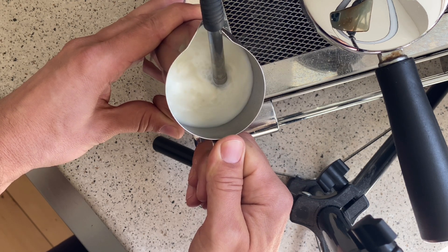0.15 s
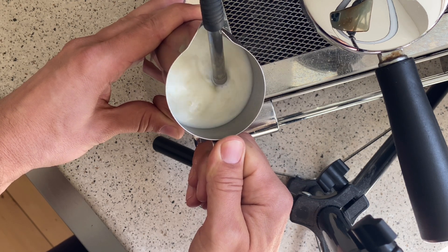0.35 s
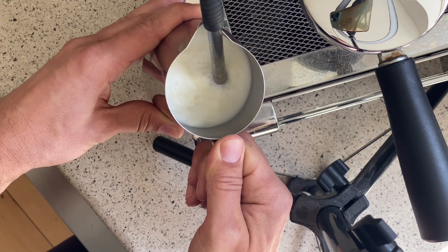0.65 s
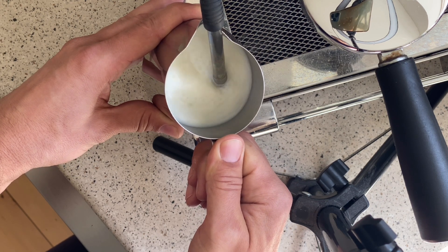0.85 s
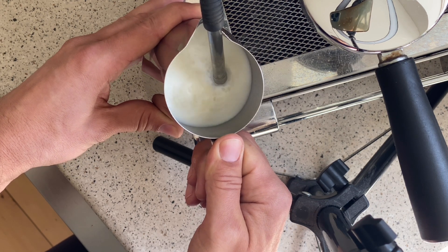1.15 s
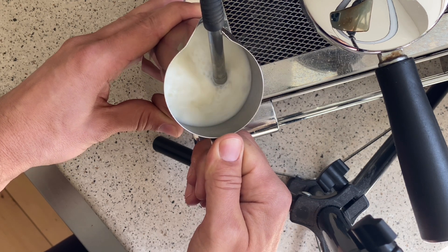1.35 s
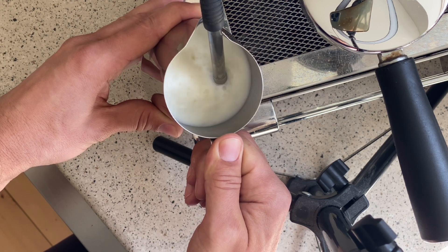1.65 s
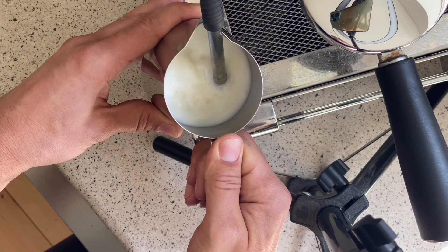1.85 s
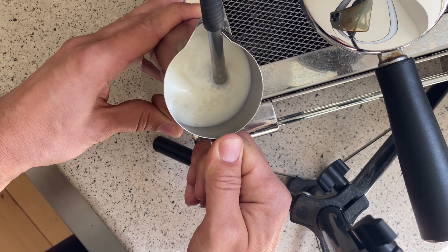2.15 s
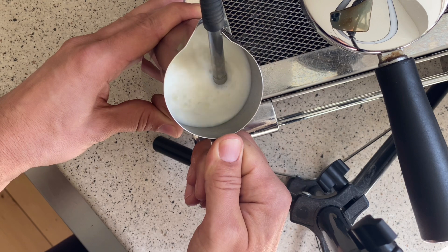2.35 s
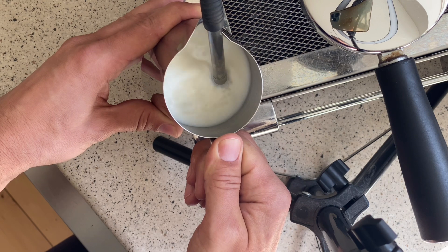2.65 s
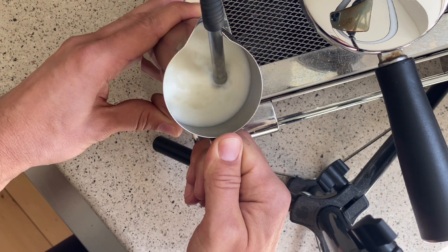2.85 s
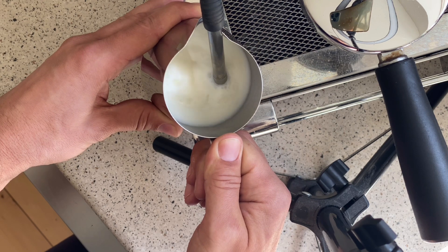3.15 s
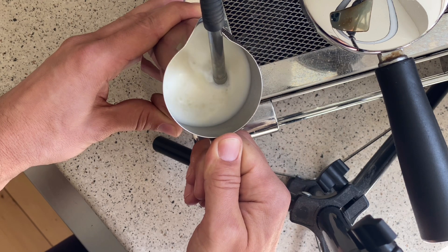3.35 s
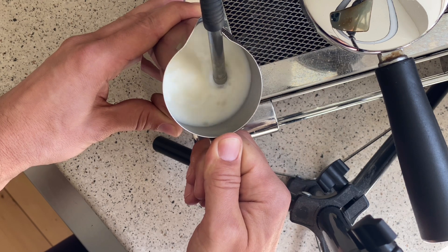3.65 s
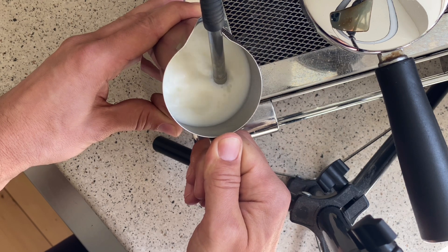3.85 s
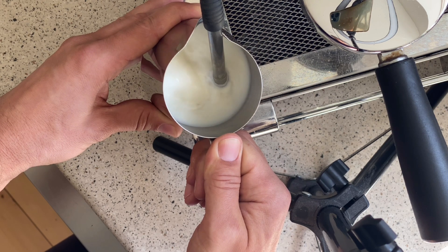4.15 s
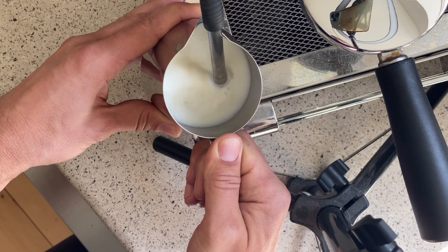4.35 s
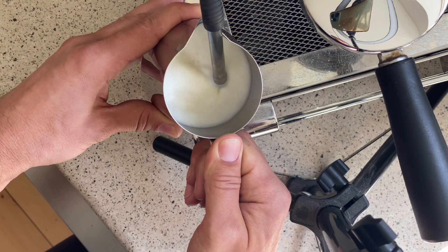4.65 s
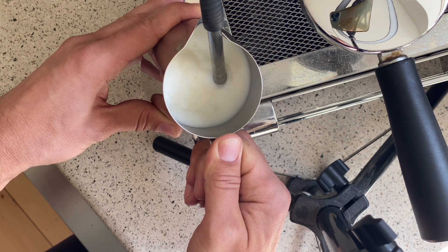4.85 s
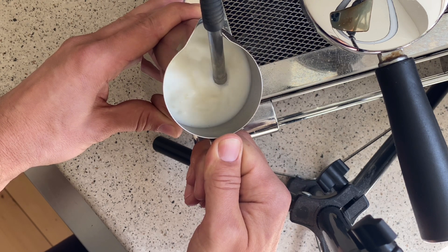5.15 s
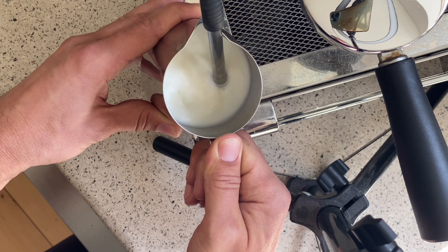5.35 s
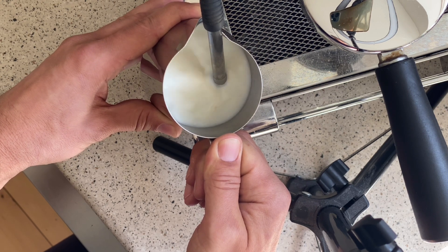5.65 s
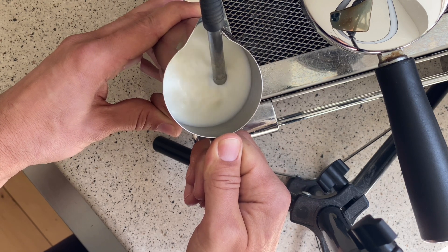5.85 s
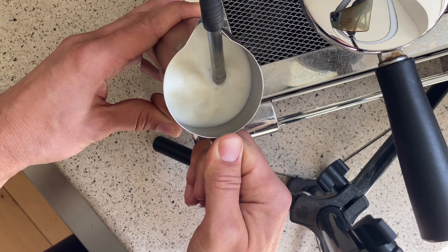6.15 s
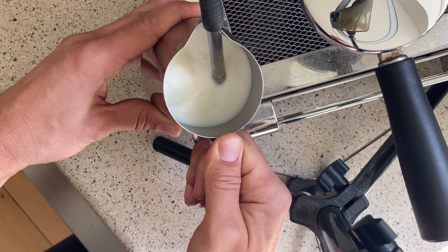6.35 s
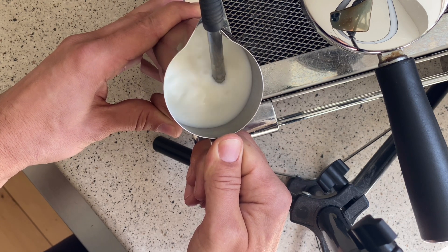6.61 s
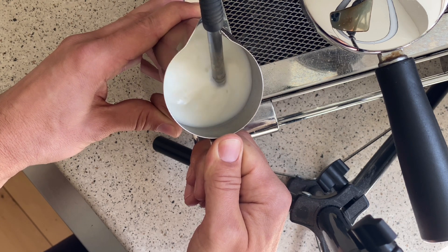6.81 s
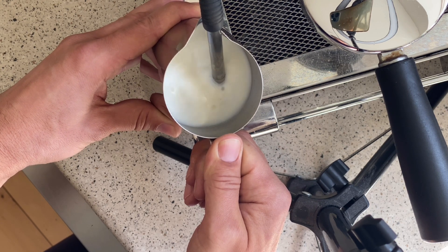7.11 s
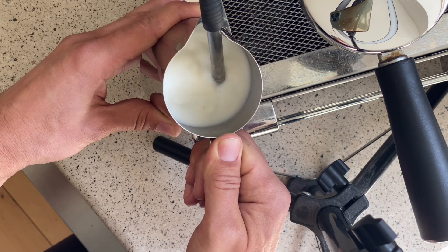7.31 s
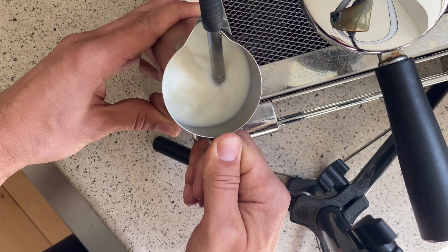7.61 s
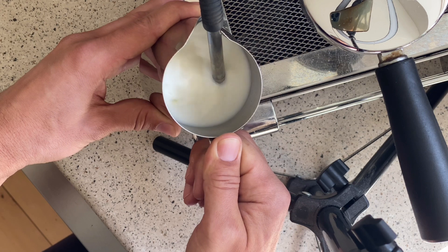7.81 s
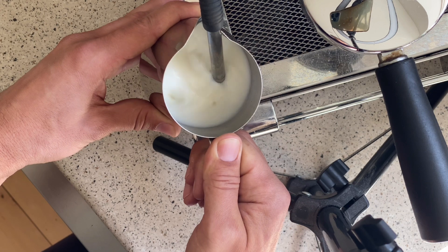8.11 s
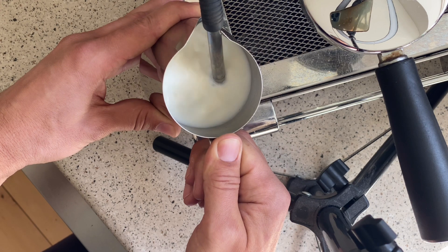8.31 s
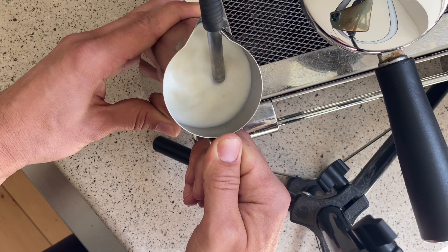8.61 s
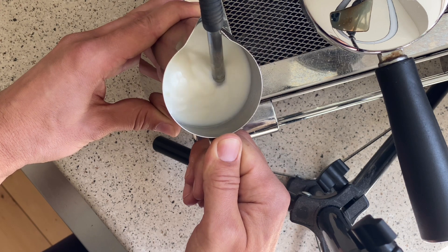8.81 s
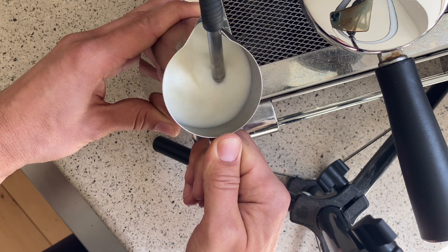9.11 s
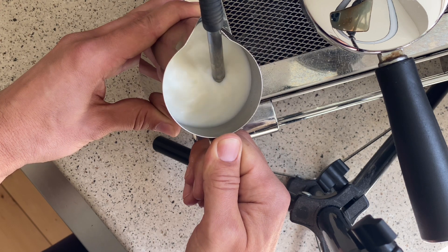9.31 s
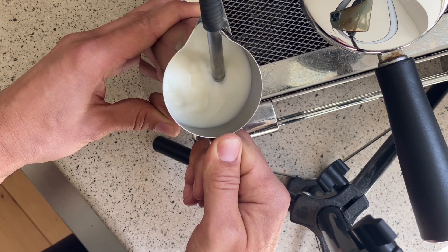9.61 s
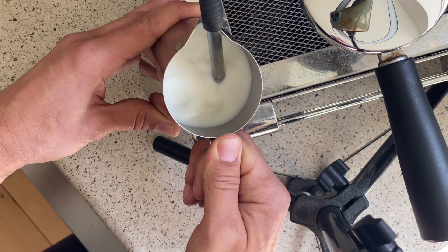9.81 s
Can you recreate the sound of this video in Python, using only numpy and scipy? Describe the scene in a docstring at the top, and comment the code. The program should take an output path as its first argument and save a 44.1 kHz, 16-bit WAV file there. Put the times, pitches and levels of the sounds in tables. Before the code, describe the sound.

Very close stereo sound of a coffee machine's steam wand frothing milk in a small steel pitcher. A steady, fluttering hiss is broken early by sharp airy spits, hollow gulps and short ringing pops. The bursts thin out midway, and after about six seconds the hiss becomes duller and smoother, with a resonant metal ring and a hollow tone that has sunk slightly. A low pump hum sits underneath.

```python
"""A steam wand hisses just under the surface of milk in a steel pitcher, heard close up through two microphone ports.
At first the shallow tip spits bright bursts of air and gulps over the pump's hum; later it sinks and the hiss dulls.
The hiss, fizz and spits are shaped noise; the pitcher wall rings as resonances that shift as froth builds.
The air cup above the milk rings as narrow noise bands that sink in pitch; gulps and pops are short ragged sines.
The ports hear it all out of step in the treble."""
import sys
import numpy as np
from scipy import signal
from scipy.fft import rfft, irfft, next_fast_len
from scipy.io import wavfile
from scipy.ndimage import uniform_filter1d, map_coordinates

SR = 44100
rng = np.random.default_rng(int(sys.argv[2]) if len(sys.argv) > 2 else 0)


def to_wav(s):
    """Save 16-bit WAV."""
    ch = np.atleast_2d(s).T  # columns
    pcm = np.round(np.clip(ch, -1, 1) * 32767)  # PCM
    wavfile.write(sys.argv[1], SR, pcm.astype(np.int16))


N = 439674

# Base levels of what the jet drives: time_s, wall_db, air_cup_db
JET_DRIVE = [(0.0, -41.5, -48), (0.77, -40.5, -42), (1.39, -43, -45.5), (2.08, -41, -41),
             (2.52, -44.5, -47), (3.05, -42.5, -43), (4.94, -44, -44.5), (5.22, -42.5, -44.5),
             (6.03, -45.5, -46), (6.91, -42, -46.5), (7.22, -43, -45), (7.77, -43.5, -47), (8.14, -43, -43),
             (8.3, -41.5, -44.5), (9.69, -42.5, -45), (9.97, -41, -40.5)]
# The air cup sinks in pitch as froth builds: time_s, main_tone_hz, low_tone_hz, froth (0-1)
AIR_CUP = [(0, 1139, 815, 0.11), (.9, 1105, 770, 0.12), (1.5, 1050, 681, 0.05), (3.5, 1009, 599.5, 0.15),
           (5.5, 977.5, 564.6, 0.4), (8, 960, 551, 0.86), (9.97, 950, 544, 0.99)]
RIM_HZ = 1102.5


def amp(db):
    """Decibels to linear gain."""
    return 10 ** (np.asarray(db) / 20)


def unit(x):
    """Scale to an rms of 1."""
    return x / np.sqrt(np.mean(np.abs(x) ** 2) + 1e-20)


def along(points, hz):
    """Read (pitch_hz, value) points on a log frequency axis."""
    point_hz, value = np.transpose(points)
    return np.interp(np.log(hz + 1), np.log(point_hz + 1), value)


def curves(rows):
    """One value per sample for each column after the time."""
    time_s, *columns = np.transpose(rows)
    return [np.interp(np.arange(N) / SR, time_s, column) for column in columns]


def wobble(rate):
    """A smooth random curve with rate knots a second."""
    knots = rng.standard_normal(int(N * rate / SR) + 4)
    return map_coordinates(knots, [np.arange(N) * rate / SR])


def filtered(x, response):
    """Filter x by a complex response of frequency, with padding for the tail."""
    size = next_fast_len(N + SR // 4)
    return irfft(rfft(x, size) * response(np.fft.rfftfreq(size, 1 / SR)), size)[..., :N]


def modes(table):
    """The causal response of (pitch_hz, width_hz, level_db) resonances, alternating in sign."""
    def response(f):
        total = 0
        for k, (hz, width_hz, db) in enumerate(table):
            damping = 1j * f * width_hz
            total = total + (-1) ** k * amp(db) * damping / (hz * hz - f * f + damping)
        return total
    return response


def coloured(spectrum):
    """A filter response drawn by (pitch_hz, level_db) points."""
    return lambda f: amp(along(spectrum, f))


def turbulence(response, grain_db, lump_db, patchy_db):
    """Two unrelated noises, rms 1, sharing grain, lumps and patches: the direct and the scattered sound."""
    z = signal.stft(rng.standard_normal((2, N)), nperseg=512)[2]
    # patches: random gains smoothed over frequency, then over time
    patches = uniform_filter1d(rng.standard_normal(z.shape[1:]), size=5, axis=0)
    patches = uniform_filter1d(patches, size=8, axis=1)
    pair = signal.istft(z * amp(patchy_db * unit(patches)), nperseg=512)[1][:, :N]
    flutter_db = grain_db * wobble(500) + lump_db * wobble(28)
    return unit(filtered(pair * amp(flutter_db), response))


def band(hz, width_hz, knocks):
    """Direct and scattered noise, rms 1, in a narrow band: slow noise shifted up to a drifting pitch."""
    noise = knocks * rng.standard_normal((2, 2, N))
    slow = filtered(noise, lambda f: 1 / (1 + (f / width_hz) ** 4))
    phase = 2 * np.pi * np.cumsum(hz + np.zeros(N)) / SR
    return unit(slow[0] * np.cos(phase) + slow[1] * np.sin(phase))


def jet():
    """Collapsing steam tears and fizzes at the surface and shakes the wall; froth shifts the wall's modes."""
    # Hiss at the surface, falling when the tip sinks: time_s, level_db before surges and wavering
    surface = [(0, -42.5), (.95, -42.3), (1.25, -43.3), (1.5, -42), (1.65, -45.5), (1.85, -42), (2.35, -43),
               (3.2, -42.5), (3.55, -40.7), (3.75, -42), (4.5, -41.5), (5.4, -42), (5.63, -44.5),
               (5.85, -43), (6.0, -46), (6.25, -48), (6.9, -45.5), (7.6, -46.3), (8.6, -46.3), (9.2, -46.3),
               (9.97, -47)]
    # Noise colour of the hiss: pitch_hz, level_db_per_hz
    tear_colour = [(3800, -30), (4500, -4), (5000, -2), (5450, -4), (5850, -7), (6150, -4), (6600, -3),
                   (7800, -5), (8600, -10), (10000, -17), (11500, -30), (14500, -70)]
    # Noise colour of the fizz: pitch_hz, level_db_per_hz
    fizz_colour = [(7000, -25), (8800, -3), (10000, -2), (10800, -1), (11600, -9), (13000, -13),
                   (14200, -21), (14700, -45), (16000, -70)]
    # Pitcher wall with thin milk: pitch_hz, width_hz, relative level_db
    thin_wall = [(1560, 350, -18.5), (2107, 46, -11), (2813, 180, -5.5), (3160, 70, -4), (3342, 71, -1),
                 (3560, 50, 3), (3805, 470, -4.5), (4460, 114, -2.5), (4880, 300, -10.5)]
    # Pitcher wall with froth: pitch_hz, width_hz, relative level_db
    frothy_wall = [(1480, 304, -1.5), (1810, 480, -3.5), (2378, 60, 2.5), (2527, 90, 4), (2586, 227, -0.5),
                   (3064, 80, 0), (3318, 62, 2), (3610, 52, -0.5), (3767, 49, 0.5), (4100, 680, -7),
                   (5070, 84, 0), (5480, 240, -1)]
    hiss_waver_db, wall_waver_db = .6, .4
    fizz_base_db, fizz_growth, shallow_db = -44.6, 2.3, -42  # fizz level at the shallow hiss level; its wider swing
    counter_s, counter_share, counter_hz = .002845, .33, 6000  # the counter's reflection, above this pitch

    hiss_surge_db, wall_surge_db = surges()
    tear_db = curves(surface)[0] + hiss_surge_db + hiss_waver_db * wobble(4)
    # the fizz follows a smoothed hiss with half the surges
    smooth_db = uniform_filter1d(tear_db - hiss_surge_db / 2, size=2000)
    fizz_db = fizz_base_db + fizz_growth * (smooth_db - shallow_db)
    wall_db = curves(JET_DRIVE)[0] + wall_surge_db + wall_waver_db * wobble(10)
    froth = np.clip(curves(AIR_CUP)[2], 0, 1)

    def reflected(f):
        share = counter_share / (1 + (counter_hz / (f + 1)) ** 8)
        return coloured(tear_colour)(f) * (1 + share * np.exp(-2j * np.pi * f * counter_s))

    def damped(table):
        return lambda f: modes(table)(f) / (1 + (f / 6500) ** 4)

    fizz = amp(fizz_db) * turbulence(coloured(fizz_colour), grain_db=2, lump_db=1.8, patchy_db=1.8)
    tear = amp(tear_db) * turbulence(reflected, grain_db=1.8, lump_db=1.3, patchy_db=1.5)
    thin = turbulence(damped(thin_wall), grain_db=2.0, lump_db=0.25, patchy_db=2.5)
    frothy = turbulence(damped(frothy_wall), grain_db=1.5, lump_db=0.65, patchy_db=2.0)
    wall = amp(wall_db) * (np.sqrt(1 - froth) * thin + np.sqrt(froth) * frothy)
    return fizz + tear + wall


def surges():
    """Surges of steam: bell-shaped rises and dips in dB of the hiss and of the wall."""
    # Surges: centre_s, hiss_change_db, wall_change_db
    surge_rows = [(.15, 4, 0), (.42, -0.5, 0), (.52, -0.5, 2.5), (.6, 1.5, -2), (.68, 4, -1.5),
                  (.9, 8.5, 1), (1.05, -0.5, -2), (1.22, -4, 2), (1.29, 1, 1.5), (1.36, 0.5, -1),
                  (1.66, 0, 0.5), (1.78, 1, 3.5), (1.941, -0.5, -5), (2.04, -4.5, 5), (2.18, 6, 2.5),
                  (2.501, -1, 5), (2.58, 4, 3), (2.78, 3, 1.5), (3.85, -2.5, 3), (4.01, 0.5, -2.5),
                  (4.12, 3.5, 2), (4.2, 4, 0), (4.28, -6, -1.5), (4.46, -1, 2.5), (5.07, -2, 1.5),
                  (5.17, -4, 0), (5.3, -1, 2), (5.801, -1, 4.5), (6.14, 0.5, 2.5), (6.76, 7, 0),
                  (6.95, 1, -1.5), (7.199, 6.5, 1), (7.77, 0.5, 1), (8.22, -2.5, 2.5), (8.45, 5.5, -0.5),
                  (8.69, -6, 2), (8.79, 4, 0), (9.4, -0.5, 1), (9.65, -6.5, 4), (9.9, -3, 2)]
    # Half length of a surge: half_length_s, one row for the hiss and one for the wall
    half_length_s = [
        [0.051],
        [0.029],
    ]
    t, out = np.arange(N) / SR, np.zeros((2, N))
    for s, hiss_db, wall_db in surge_rows:
        near = slice(max(round((s - .3) * SR), 0), round((s + .3) * SR))
        bell = np.exp(-((t[near] - s) / half_length_s) ** 2)
        out[:, near] += [[hiss_db], [wall_db]] * bell
    return out


def spits():
    """Each burst of air moves from its start level to its peak, crackles and dies into a faint tail and splash."""
    # Air spits: start_s, level_db, start_db against that level, swell_s, t60_s,
    # splash_db against that level, treble_db added to the treble layer
    spit_rows = [(.18, -27, -8, .001, .03, -20, 0), (.197, -16.5, -8, .002, .1, -24, -2),
                 (.348, -16.5, -5, .018, .07, -23, -1), (.439, -25, -6, .0185, .045, -20, 0),
                 (.589, -23, 3, .003, .045, -16, -2), (.726, -39, -8, .002, .3, -16, 0),
                 (.859, -19, -8, .008, .14, -16, 0), (.888, -24, -8, .012, .07, -16, 0),
                 (.918, -22, -8, .01, .08, -15, 0), (.936, -21, -8, .008, .08, -15, 0),
                 (1.12, -24.5, 1, .016, .05, -18, 0), (1.5625, -21, 8, .02, .08, -19, -1),
                 (1.741, -20, -3, .026, .08, -18, -1), (1.831, -23, 0, .012, .06, -20, -1),
                 (2.235, -28, 4, .02, .1, -16, 1), (2.275, -25, -5, .0035, .06, -18, 1),
                 (2.544, -24.5, 10, .022, .08, -12, 0), (2.58, -22, -5, .011, .06, -16, 0),
                 (2.794, -37, -8, .001, .07, -14, 0), (2.863, -23, 3, .008, .035, -11, 0),
                 (3.028, -40, -8, .0065, .15, -14, 0), (3.051, -26, 2, .009, .03, -18, 2),
                 (3.061, -24, 5, .015, .07, -14, -1), (3.405, -20, -5, .003, .018, -18, -2),
                 (3.525, -25, 0, .006, .014, -12, -4), (3.561, -15.5, -4, .003, .025, -18, -4),
                 (3.917, -42, -8, .003, .06, -14, 0), (4.084, -36, -8, .001, .08, -14, 0),
                 (4.102, -24.5, -8, .029, .025, -7, -5), (4.494, -21, -5, .01, .025, -15, 0),
                 (4.634, -25, 5, .013, .04, -14, -1), (4.676, -30, -4, .003, .03, -14, -2),
                 (4.985, -22.5, -3, .001, .04, -18, -4), (4.997, -32, -3, .012, .06, -9, -1),
                 (5.155, -35, -5, .017, .05, 1, -12), (5.404, -26, 0, .006, .03, -10, -3),
                 (5.519, -21, -1, .011, .06, -12, -3), (5.925, -25, 7, .012, .045, -12, -3)]
    # Noise colour of a spit's body: pitch_hz, level_db_per_hz
    body_colour = [(5000, -40), (7200, -18), (8000, -10), (8700, -10), (9400, -7), (10000, -2), (10700, 0),
                   (11500, -4), (12100, -7), (12600, -30), (14000, -70)]
    # Noise colour of its treble: pitch_hz, level_db_per_hz
    treble_colour = [(11000, -60), (12100, -12), (13000, 0), (14100, -4), (15500, -7)]
    # Noise colour of its duller splash: pitch_hz, level_db_per_hz
    splash_colour = [(2500, -30), (3800, -15), (5000, -7), (5800, -8), (6600, -3), (7800, 0), (9000, -20),
                     (12000, -60)]
    body_db, treble_base_db = -2.2, -4  # against the spit's level
    crackle_db, stutter_db = 2, 1.1  # fine crackle; stutter about every 5 ms

    t, out = np.arange(SR // 4) / SR, np.zeros((3, N + SR))
    for s, db, start_db, swell, t60, splash_db, treble_db in spit_rows:
        tail = .13 * amp(-60 * (t - swell) / .2)
        fade = .87 * amp(-60 * (t - swell) / t60) + tail
        rise = amp(start_db * (1 - np.minimum(t / swell, 1)) ** 2)
        onset = 1 - np.exp(-t / .0003)
        shape = amp(db) * np.where(t < swell, rise, fade) * onset
        layers_db = [[body_db], [treble_base_db + treble_db], [splash_db]]
        out[:, round(s * SR):][:, :len(t)] += amp(layers_db) * shape
    crackle = unit(amp(crackle_db * wobble(2500) + stutter_db * wobble(200)))
    body, treble, splash = out[:, :N] * crackle

    def layer(spectrum):
        return turbulence(coloured(spectrum), grain_db=1, lump_db=0, patchy_db=1.5)

    return body * layer(body_colour) + treble * layer(treble_colour) + splash * layer(splash_colour)


def cup():
    """Bubbles knock the air cup's two sinking tones; the rim's fixed-pitch ring emerges with the froth."""
    cup_waver_db = .8
    main_hz, low_hz, froth = curves(AIR_CUP)
    knocks = amp(2.3 * wobble(45))
    main = amp(-5.5) * band(main_hz, 79, knocks)
    low = amp(-24.5 + 6 * froth + 1.5 * wobble(14)) * band(low_hz, 40, knocks)
    rim = amp(-12.0 + 9.2 * np.clip(froth, 0, 1)) * band(RIM_HZ, 76, knocks)
    return amp(curves(JET_DRIVE)[1] + cup_waver_db * wobble(10)) * (main + rim + low)


def gulps():
    """Each gulp of air rings cup, rim and wall with ragged pitch, thuds in the milk and leaves it burbling."""
    # Gulps: start_s, level_db, low_tone_db and wall_db against that level (each trimmed below)
    gulp_rows = [(.184, -37, -9, -24), (.208, -40, -3, -20), (0.302, -38.5, -10, -22),
                 (0.36, -41.5, 0, -14), (.488, -32.5, -14, -31), (0.864, -33.5, 4, -1),
                 (0.903, -40, -3, -10), (0.932, -38.5, 0.5, -18), (0.999, -37.5, -31, -24),
                 (1.198, -37.5, -23, -19), (1.578, -34.5, -9, -9), (1.751, -32, -5.5, -9),
                 (1.842, -39, -27, 0), (2.13, -33, -19, -20), (2.206, -28, -28, -4.5),
                 (2.243, -35.5, -6, -1), (2.555, -30.5, -17, -6), (2.6, -42, -3, -14),
                 (2.792, -41, -25, -24), (2.864, -40.5, -12, -21), (3.34, -37, -8, -10),
                 (3.056, -38.5, -9, 1), (3.078, -46, -5, -12), (3.564, -39, -34, -2),
                 (4.121, -39.5, -13, -3), (4.636, -33.5, -6.5, -25), (4.993, -37, -11, -1.5),
                 (5.525, -30, -9, -20), (5.927, -43, -7, -10), (8.212, -37.5, -27, -18)]
    # Noise colour of the bubbling after a gulp: pitch_hz, level_db_per_hz
    burble_colour = [(450, -40), (750, -4.5), (1050, 4.5), (1650, -5.5), (2300, -38)]
    wall_hz, thud_hz = 1596, 275.3
    thud_db = -10  # against the low cup tone
    gurgle_db = 2  # a gulp breaks into uneven bubbles
    burble_db, burble_t60_s = -7, .14  # level against the gulp's; decay

    t, out, bubbling = np.arange(SR // 8) / SR, np.zeros(N + SR), np.zeros(N + SR)
    main_hz, low_hz, _ = curves(AIR_CUP)
    onset = 1 - np.exp(-t / .004)

    def ping(hz, db, t60, ragged):
        drift = ragged * np.cumsum(rng.standard_normal(len(t))) / np.sqrt(SR)
        return amp(db - 60 * t / t60) * np.sin(2 * np.pi * hz * t + drift)

    for s, db, low_db, wall_db in gulp_rows:
        k = round(s * SR)
        ring = ping(main_hz[k], 4.5, 0.048, ragged=11.7)
        ring += ping(RIM_HZ, -0.5, 0.082, ragged=9.6)
        ring += ping(low_hz[k], low_db, 0.11, ragged=11.0)
        ring += ping(wall_hz, wall_db + 0.5, 0.092, ragged=32.5)
        ring += ping(thud_hz, low_db + thud_db, 0.26, ragged=23.0)
        out[k:][:len(t)] += amp(db + 1.5) * ring * onset
        bubbling[k:][:len(t)] += amp(db + burble_db - 60 * t / burble_t60_s) * onset
    bubble_noise = amp(3 * wobble(70)) * rng.standard_normal((2, N))
    burble = bubbling[:N] * unit(filtered(bubble_noise, coloured(burble_colour)))
    gurgle = unit(amp(gurgle_db * wobble(240)))
    return out[:N] * gurgle * [[1], [0]] + burble  # the rings are direct sound only


def pops():
    """Steam bubbles collapse with a short ragged ring; many small ones fall between, thinning as the tip sinks."""
    # Larger pops: start_s, level_db before the ring trim, pitch_hz
    large = [(0.4149, -26, 3320), (0.4732, -25.5, 3280), (0.5276, -28, 3580), (0.6129, -24, 3330),
             (0.8948, -22, 4180), (1.0813, -28, 3350), (1.215, -30, 3360), (1.4949, -34, 3360),
             (1.5149, -24, 3560), (1.656, -29, 3330), (1.719, -24.5, 3370), (1.7743, -23, 3830),
             (1.871, -30, 3630), (2.0072, -32, 3560), (2.0357, -26, 3220), (2.1205, -30, 5320),
             (2.157, -31, 4500), (2.4891, -32, 3540), (2.752, -27, 3320), (3.5263, -30, 3660),
             (3.6715, -32, 3780), (3.7059, -33, 3310), (3.9478, -33, 3790), (4.1229, -17, 5450),
             (4.4502, -25, 3570), (4.4826, -26, 3530), (5.1247, -34, 3460), (5.1641, -27, 3250),
             (5.4409, -31, 3590), (5.5232, -22, 4360), (5.9278, -31, 3540), (6.0291, -31, 2740),
             (7.7094, -28, 3380), (7.9448, -28, 3170), (8.6597, -31, 3310), (8.6894, -34, 3350),
             (8.7194, -30, 3330), (8.7728, -24, 3290), (8.7994, -31, 3290), (9.8944, -27, 4500)]
    t60_s, ragged, ring_trim_db = 0.043, 56.5, -4.5
    count, floor_db, spread_db, centre_hz = 110, -40, 2.5, 3300  # the small pops, before the ring trim

    t, out = np.arange(SR // 24) / SR, np.zeros(N + SR)
    u = rng.random((count, 3))
    small_s = N / SR * u[:, 0] ** 1.4  # denser early on
    small_db = floor_db - spread_db * np.log(u[:, 1])
    small_hz = centre_hz * 2 ** (1.6 * u[:, 2] - .8)
    small = np.transpose([small_s, small_db, small_hz])
    for s, db, hz in [*large, *small]:
        drift = ragged * np.cumsum(rng.standard_normal(len(t))) / np.sqrt(SR)
        ring = amp(db + ring_trim_db - 60 * t / t60_s) * np.sin(2 * np.pi * hz * t + drift)
        out[round(s * SR):][:len(t)] += ring * (1 - np.exp(-t / .0007))
    return out[:N] * [[1], [.3]]  # direct, scattered


def machine():
    """The milk churns as low noise; the pump hums as a drifting sine with a weaker octave."""
    # Noise colour of the churning milk: pitch_hz, level_db_per_hz
    churn_colour = [(25, -54), (55, -6), (76, -14.5), (108, -12), (170, -27.5), (220, -10.5), (270, -21.5),
                    (330, -22.5), (430, -28.5), (700, -27), (900, -17), (1500, -120)]
    # Pump hum: time_s, level_db before wavering
    pump_level = [(0, -58), (1.1, -59), (2.3, -56.5), (3.4, -54), (4.5, -52.5), (6.2, -57), (8, -53.5),
                  (9.3, -52), (9.97, -52.5)]
    pump_hz, churn_db = 48.64, -56.5

    phase = 2 * np.pi * np.cumsum(pump_hz + .5 * wobble(1.5)) / SR
    octave = amp(-12.0 + 0.64 * wobble(9.5)) * np.sin(2 * phase)
    hum = np.sin(phase) + octave
    pump = np.sqrt(2) * amp(curves(pump_level)[0] + .6 * wobble(3)) * hum
    churn = amp(churn_db) * turbulence(coloured(churn_colour), grain_db=-0.3, lump_db=0.05, patchy_db=1.5)
    return churn + pump * [[1], [0]]  # the pump is direct sound only


def ports(pair):
    """Both ports share the direct sound, out of step by frequency; the scattered sound makes them differ."""
    # Phase by which the left port leads: pitch_hz, lead_rad
    lead = [(100, 0), (520, -.45), (780, -.1), (1030, -.3), (1800, 0), (2670, .7), (3700, .1), (4200, .4),
            (4850, 2.1), (5650, 1.5), (7400, 2.45), (8300, np.pi), (11200, np.pi), (12300, 3.9),
            (15200, 5.1)]
    # Likeness of the two ports: pitch_hz, likeness (0-1)
    alike = [(100, .9999), (200, .97), (500, .78), (950, .94), (1400, .96), (1800, .998), (2700, .9),
             (3600, .95), (5700, .78), (7800, .9), (8500, .994), (11000, .99), (12500, .87), (14300, .7)]

    def balance(f):
        turn = np.arccos(np.clip(along(alike, f), 0, 1)) / 2
        return np.array([np.cos(turn), np.sin(turn)])

    direct, scattered = filtered(pair, balance)
    both = np.array([direct + scattered, direct - scattered])
    return filtered(both, lambda f: np.exp(.5j * along(lead, f) * np.array([[1], [-1]])))


def scene():
    """All sources summed as direct and scattered sound, then heard at the two ports."""
    return ports(jet() + spits() + cup() + gulps() + pops() + machine())


def record(dry):
    """A steep low-pass removes what lies above the microphones' band limit."""
    top_hz = 15750
    return filtered(dry, lambda hz: 1 / (1 + (hz / top_hz) ** 300))


dry = scene()
out = record(dry)
to_wav(out)
```